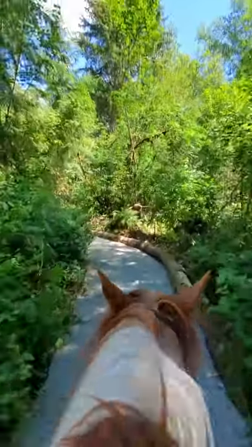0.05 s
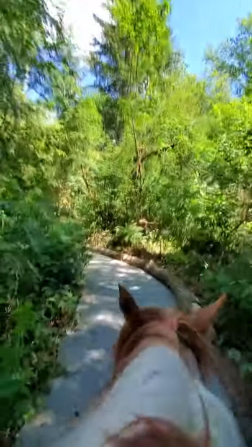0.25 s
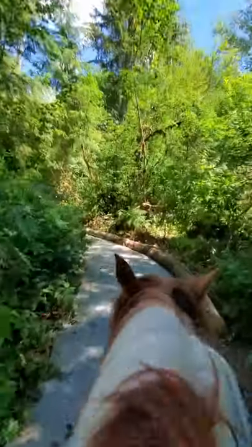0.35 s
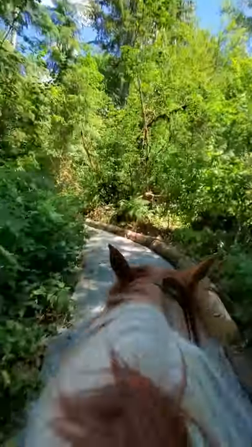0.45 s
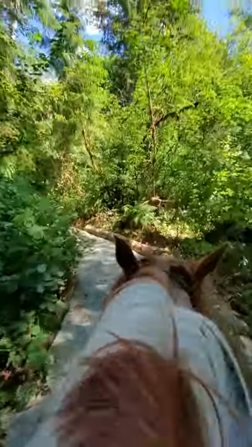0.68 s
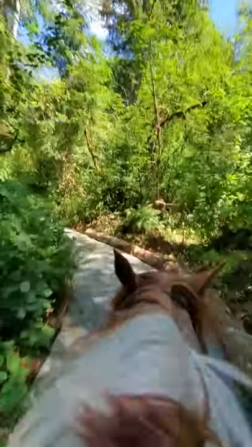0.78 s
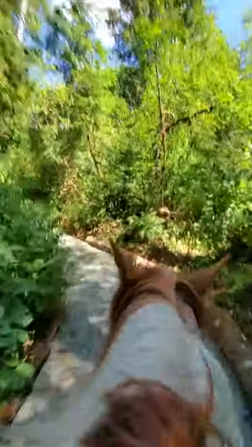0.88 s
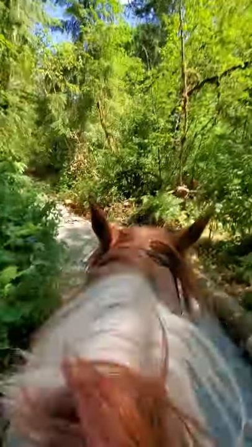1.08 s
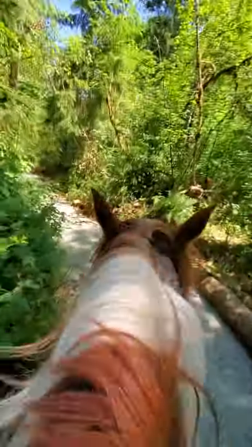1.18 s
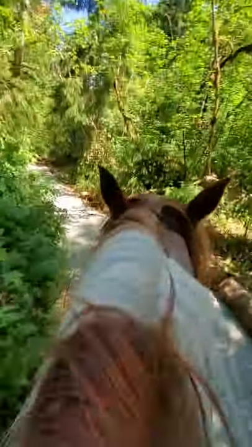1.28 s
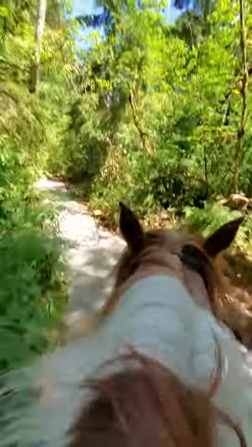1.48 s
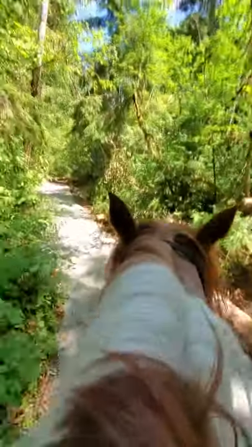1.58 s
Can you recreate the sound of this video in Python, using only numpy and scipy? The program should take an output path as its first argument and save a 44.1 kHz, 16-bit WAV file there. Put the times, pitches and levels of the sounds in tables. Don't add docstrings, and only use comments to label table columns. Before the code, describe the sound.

Horse hooves crunch on gravel at once, with dull clods and a tiny bit-ring chink before 0.1 s. Heavy wind thumps hit the right side around 0.2-0.35 s. More gritty steps follow near 0.4, 0.7 and 0.9-1.1 s, with a sharp stone click at 0.96 s. Lighter scuffs and knocks come from 1.3 s to the end, over faint leaf rustle, heard close on a handheld stereo phone.

```python
import sys
import numpy as np
from scipy import signal
from scipy.fft import rfft, irfft
from scipy.io import wavfile

SR = 44100
rng = np.random.default_rng(int(sys.argv[2]) if len(sys.argv) > 2 else 0)


def wav_out(sig):
    wavfile.write(sys.argv[1], SR, np.round(np.clip(np.atleast_2d(sig).T, -1, 1) * 32767).astype(np.int16))


def linear_from_db(decibels):
    return 10 ** (np.asarray(decibels, float) / 20)


N = 72765
T = np.arange(N) / SR
HZ = np.fft.rfftfreq(N, 1 / SR)

# start in seconds, length in seconds, clop, grit and swish levels in dB.
SCUFFS = [(-.02, 0.058, -44.5, -51, -84), (0.029, 0.066, -39, -49.5, -51.5),
          (0.079, 0.087, -34.5, -39.5, -45), (0.126, 0.088, -39, -38.5, -52.5),
          (0.164, 0.21, -44, -45.5, -54), (0.342, 0.11, -30, -36.5, -46), (0.422, 0.078, -43, -46, -68),
          (0.483, 0.14, -48, -46, -56.5), (0.646, 0.039, -44.5, -43.5, -47.5),
          (0.686, 0.065, -37.5, -40.5, -37.5), (0.711, 0.046, -31, -32.5, -42),
          (0.735, 0.12, -39, -45.5, -76), (0.844, 0.11, -38.5, -41, -50.5),
          (0.966, 0.11, -36.5, -35.5, -52), (1, 0.077, -31.5, -38, -42.5), (1.065, 0.07, -36, -41.5, -49),
          (1.128, 0.044, -38, -39.5, -40), (1.276, 0.056, -40, -41, -57), (1.316, 0.1, -35.5, -38.5, -43),
          (1.406, 0.051, -37.5, -40.5, -46.5), (1.44, 0.15, -45, -42.5, -42),
          (1.615, 0.1, -34, -38.5, -43.5)]
# start in seconds, length in seconds, level in dB.
FAR_SCUFFS = [
    (0.032, 0.053, -40),
    (0.066, 0.058, -36),
    (0.867, 0.06, -40.5),
    (1.268, 0.021, -62),
    (1.347, 0.048, -63),
]
# start in seconds, length in seconds, level in dB.
SWISHES = [
    (0.304, 0.024, -47),
    (0.351, 0.079, -38.5),
    (1.101, 0.023, -41),
    (1.533, 0.0099, -37.5),
]
# frequency in Hz, level in dB.
CLOP_SPECTRUM = [(150, -1.5), (300, -8), (480, -2), (700, -1), (1000, -2), (1400, -4.5), (2500, -21)]
GRIT_SPECTRUM = [(1000, 0.5), (1700, -2), (2500, -1), (3500, -2), (4500, -6), (5200, -11.5), (7000, -24)]
SWISH_SPECTRUM = [(3000, -40), (5500, 3), (7300, -2), (10000, -1), (13000, 0), (16000, -4)]
FAR_GRIT_SPECTRUM = [(600, 1.5), (1300, -14.5), (2200, -9), (3300, -17.5), (4500, -23), (8000, -34)]
# frequency in Hz, level in dB.
RIGHT_SHADOW = [(300, 7), (700, -0.5), (1200, -2), (2000, -6.5), (3500, -10.5), (6000, -18), (15000, -18.5)]
# frequency in Hz, likeness from 0 to 1.
PORT_LIKENESS = [(300, 1), (900, 0.88), (2000, 0.27), (3500, 0.23), (6000, 0.071)]
# peak time in seconds, peak in dB, pitch in Hz,
# left minus right in dB.
CLODS = [(0.0763, -23, 630, -29), (0.0846, -28, 766, -21), (0.0925, -21, 674, -7), (0.1056, -18, 670, -10),
         (0.1155, -23, 730, 2), (0.1237, -24, 710, 4.2), (0.1417, -22, 740, 8), (0.1489, -23, 690, 2.6),
         (0.1614, -26.3, 620, 3.9), (0.1694, -19.5, 634, -13), (0.1786, -27, 690, 8), (0.3776, -27, 640, 0),
         (0.3844, -28, 805, 8), (0.3955, -24, 665, 1.4), (0.4033, -25.5, 780, 7), (0.4122, -25.4, 626, 4.6),
         (0.4305, -28, 678, 6), (0.4546, -22.5, 860, 8), (0.6655, -25, 693, 4), (0.7198, -18, 730, 4),
         (0.7254, -20.5, 825, 0), (0.7353, -20, 600, 14.5), (0.7434, -27.5, 585, 10),
         (0.777, -25, 614, 3.6), (0.8026, -25.5, 750, 9), (0.8882, -35, 564, -5), (0.9137, -24, 659, -1),
         (0.9214, -28, 636, 2), (0.9885, -21, 770, -16.3), (1.0106, -26, 745, -10),
         (1.0219, -19, 681, -1.7), (1.0287, -21.5, 690, -1), (1.0352, -23, 680, 2), (1.0459, -30, 580, -5),
         (1.0526, -23, 550, 0.3), (1.0669, -22.5, 666, 8), (1.0831, -18, 540, 4.5), (1.106, -31.9, 684, 1),
         (1.4978, -20.5, 810, -21), (1.6435, -23.5, 730, -4)]
# peak time in seconds, peak in dB, pitch in Hz, left minus right in dB.
KNOCKS = [(0.3888, -18, 200, -32), (0.6469, -24.5, 280, 26), (0.654, -19.5, 310, 25), (0.61, -38, 83.3, 8),
          (.7365, -18.5, 328, 21), (0.839, -30, 203, 21), (0.9142, -29.5, 334, 0), (.9190, -21, 208, -16),
          (0.995, -22, 110, -33), (1.0240, -22.5, 170, -28), (1.0293, -26, 283, -3), (1.036, -17, 234, -16),
          (1.354, -23, 255, -32), (1.4894, -17, 310, -23), (1.5012, -25, 324, -5)]
# peak time in seconds, peak in dB, pitch in Hz, right port relative to left in dB.
TICKS = [(0.1707, -29.5, 2500, -2), (.7770, -25, 2400, -6), (0.8515, -28, 2500, -4),
         (1.5395, -23.5, 3700, -5), (.7220, -24, 3500, -6), (0.7295, -23, 3950, -13),
         (.9591, -5, 3770, -16), (1.1362, -26.5, 3370, -8), (1.1420, -23.5, 3840, -7),
         (1.4660, -46, 1010, 14), (1.6250, -26.5, 3440, -33)]
# start in seconds, level in dB, pitch ratio.
CHINKS = [
    (0.034, -63, 1.2),
    (0.046, -55, 1.3),
    (.077, -39, 1.0),
    (.095, -43, 1.005),
]
# frequency in Hz, level in dB, 60 dB decay time in seconds.
RING_MODES = [(9180, -9, .05), (9900, -8, .07), (12400, -2, .05), (12680, 0, .07), (15100, -4, .06),
              (15350, -9, .05)]
# time in seconds, level in dB.
LEFT_WIND = [(0, -64), (.17, -37.5), (.32, -46.5), (.54, -61), (.67, -34.5), (.8, -50), (1.14, -56),
             (1.2, -58), (1.36, -46), (1.55, -59), (1.62, -53)]
RIGHT_WIND = [(0, -43), (.12, -34.5), (.17, -35), (.22, -34), (.3, -32.5), (.42, -35.5), (.63, -38),
              (.85, -40), (.95, -32), (1.07, -40.5), (1.29, -44.5), (1.38, -39.5), (1.45, -38.5),
              (1.65, -46)]
# frequency in Hz, level in dB.
RUMBLE_SPECTRUM = [(28, -52), (42, -5), (70, 7.5), (95, 0.5), (130, -5.5), (200, -13), (350, -27),
                   (600, -103)]
FLUTTER_SPECTRUM = [(60, -2), (120, -6.5), (200, -9.5), (300, -11), (500, -31), (900, -87)]
# trough time in seconds, peak in dB, pitch in Hz.
SLAPS = [(.2107, -20, 170), (.2196, -13, 90), (.2317, -12, 105), (.2470, -15, 55), (.2567, -17, 190),
         (.2666, -5, 135), (.2813, -13, 170), (.2895, -15, 110), (.2974, -1.5, 210), (.3134, -9, 100),
         (.3241, -12, 95), (.3377, -12, 140), (1.3309, -25, 70), (1.3779, -17, 82), (1.4060, -20, 74),
         (.0888, -22, 70), (.1143, -25, 70), (.1350, -26, 80), (.1483, -24, 70), (.3605, -18, 60),
         (.3799, -17, 65), (.3937, -15, 95), (.4058, -18, 85), (.4516, -25, 70), (.4996, -20, 80),
         (.5222, -25, 80), (.5424, -22, 150), (.6066, -25, 100), (.9501, -20, 75), (.9789, -24, 77),
         (1.1613, -24, 130), (1.1752, -27, 70), (1.6085, -26, 70), (1.6205, -28, 80)]
# frequency in Hz, level in dB.
FOREST_SPECTRUM = [(150, -16), (400, -28), (1000, -22), (2000, -8.5), (3500, -12.5), (5500, -18.5),
                   (7500, -23), (16000, -22.5)]


def evened(x):
    return x / np.sqrt(np.mean(x ** 2) + 1e-20)


def read(points):
    hz, value = np.transpose(points)
    return np.interp(np.log(HZ + 1), np.log(hz + 1), value)


def colour(x, spectrum):
    return evened(irfft(rfft(x) * linear_from_db(read(spectrum)), N))


def pan(left_minus_right_db):
    return linear_from_db([[min(left_minus_right_db, 0)], [min(-left_minus_right_db, 0)]])


def grains(per_s, spread_db, smooth, low_hz, high_hz, cycles, count=8):
    draw, size, hiss = rng.random(N), rng.exponential(1, N), rng.standard_normal((2, N))
    clicks = np.sign(hiss[0]) * linear_from_db(spread_db * np.minimum(size, 3)) * (draw < per_s / SR)
    kind, out = rng.integers(0, count, N), np.zeros(N)
    t = T[:1500]
    for k, hz in enumerate(np.geomspace(low_hz, high_hz, count)):
        u = t * hz / cycles
        ringing = hz * u * np.exp(-3 * u) * np.sin(2 * np.pi * hz * t)
        out += signal.oaconvolve(clicks * (kind == k), ringing)[:N]
    return evened(out) + smooth * hiss[1] * np.sqrt(SR / 2 / high_hz)


def strokes(start, length, db):
    early_peak, tail_db, tail_s = 0.74, -12, 0.048
    u, length = T - np.asarray(start)[:, None], np.asarray(length)[:, None]
    swell = np.sin(np.pi * np.clip(u / length, 0, 1) ** early_peak) ** 2
    tail = linear_from_db(2 * tail_db) * np.exp(-abs(u - length) / tail_s) * (u > length / 2)
    power = linear_from_db(2 * np.asarray(db))[:, None] * (swell + tail)
    return np.sqrt(power.sum(0))


def ports(a, b):
    same = np.clip(read(PORT_LIKENESS), 0, 1)
    left = rfft(a) * np.exp(-2j * np.pi * HZ * 0.00027)
    blend = same * rfft(a) + np.sqrt(1 - same ** 2) * rfft(b)
    return irfft(np.array([left, linear_from_db(read(RIGHT_SHADOW)) * blend]), N)


def scuff_layers():
    start, length, clop_db, grit_db, swish_db = np.transpose(SCUFFS)
    clop = colour(grains(700, 2.1, 0.48, 315.0, 1238, cycles=2.6), CLOP_SPECTRUM)
    grit = colour(grains(1200, 2.6, 0.97, 1655, 5390, cycles=3.54), GRIT_SPECTRUM)
    swish = colour(grains(6000, 3.9, 1.6, 5330, 22600, cycles=5.5), SWISH_SPECTRUM)
    swish_level = np.hypot(strokes(start, length, swish_db), strokes(*np.transpose(SWISHES)))
    return (strokes(start, length, clop_db - 3) * clop
            + strokes(start, length, grit_db) * grit
            + swish_level * swish)


def scuffs():
    near = ports(scuff_layers(), scuff_layers())
    far_grit = colour(grains(1800, 0.81, 0.97, 1040, 3580, cycles=7.1), FAR_GRIT_SPECTRUM)
    far = strokes(*np.transpose(FAR_SCUFFS)) * far_grit
    return near + far * linear_from_db([[-6], [0]])


def blip(s, db, hz, cycles, ring_on=1.79):
    u = np.clip((T - s) * hz, -9, 9)
    envelope = np.exp(-(u / cycles / np.where(u > 0, ring_on, 1)) ** 2)
    return linear_from_db(db) * envelope * np.cos(2 * np.pi * u)


def clods():
    out = np.zeros((2, N))
    for s, db, hz, pan_db in CLODS:
        out += blip(s, db - 5, hz, 0.9, ring_on=1.2) * pan(pan_db)
    return out


def knocks():
    out = np.zeros((2, N))
    for s, db, hz, pan_db in KNOCKS:
        out += blip(s, db, hz, 0.51) * pan(pan_db)
    return out


def tick(s, db, hz):
    width, edge_db = 0.47, -19
    u = np.clip((T - s) * hz, -30, 30)
    envelope = np.exp(-(u / np.where(u > 0, 7, 2.5)) ** 2)
    band = np.sinc(width * u) * envelope * np.cos(2 * np.pi * u)
    return linear_from_db(db) * (band + linear_from_db(edge_db) * np.exp(-(6 * u) ** 2))


def ticks():
    out = np.zeros((2, N))
    for s, db, hz, right_db in TICKS:
        out += [tick(s, db, hz), -blip(s + 0.00041, db + right_db, 0.55 * hz, 0.25)]
    return out


def chinks():
    out = np.zeros((2, N))
    for s, db, ratio in CHINKS:
        u = np.maximum(T - s, 0)
        modes = np.zeros(N)
        for hz, mode_db, t60 in RING_MODES:
            modes += linear_from_db(db + mode_db - 60 * u / t60) * np.sin(2 * np.pi * hz * ratio * u)
        out += np.minimum(u / .004, 1) * modes * linear_from_db([[0], [-17]])
    return out


def slap(s, db, hz):
    cycles, lead, settle, build = 0.5, 0.22, 0.6, 0.5
    u = np.clip((T - s) * hz, -9, 9)
    u = np.where(u > 0, settle * u, np.maximum(u, build * (u + .5) - .5))
    envelope = np.exp((lead ** 2 - (u + lead) ** 2) / cycles ** 2)
    return -linear_from_db(db) * envelope * np.cos(2 * np.pi * u)


def wind():
    left_db = np.interp(T, *np.transpose(LEFT_WIND))
    right_db = np.interp(T, *np.transpose(RIGHT_WIND)) + 3.9
    level_db = np.array([left_db, right_db])
    rumble = np.array([colour(rng.standard_normal(N), RUMBLE_SPECTRUM) for _ in range(2)])
    flutter = np.array([colour(rng.standard_normal(N), FLUTTER_SPECTRUM) for _ in range(2)])
    flutter_db = 1.2 * level_db + 0.5 + np.array([[9], [0]])
    out = linear_from_db(level_db) * rumble + linear_from_db(flutter_db) * flutter
    for s, db, hz in SLAPS:
        out[1] += slap(s, db, hz)
    out[0] += linear_from_db(-38.0) * out[1]
    return out


def forest():
    twins = [colour(rng.standard_normal(N), FOREST_SPECTRUM) for _ in range(2)]
    return linear_from_db(-51.5) * ports(*twins)


def scene():
    return scuffs() + clods() + knocks() + ticks() + chinks() + wind() + forest()


def roll_off(x):
    return signal.sosfilt(signal.butter(12, 15900, fs=SR, output="sos"), x)


def record(dry):
    low_pass = signal.firwin(1501, 15930, window=("kaiser", 9), fs=SR)
    band = signal.oaconvolve(dry, low_pass[None], "same")
    high_pass = signal.butter(2, 31, "high", fs=SR, output="sos")
    mix = signal.sosfiltfilt(high_pass, band)
    return roll_off(mix)


dry = scene()
out = record(dry)
wav_out(out)
```